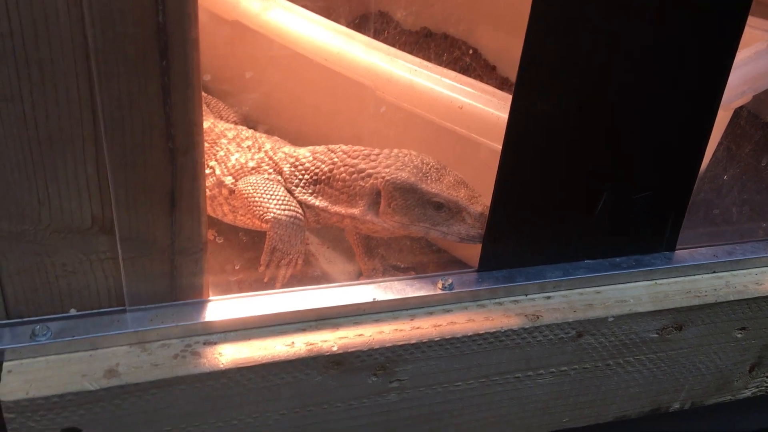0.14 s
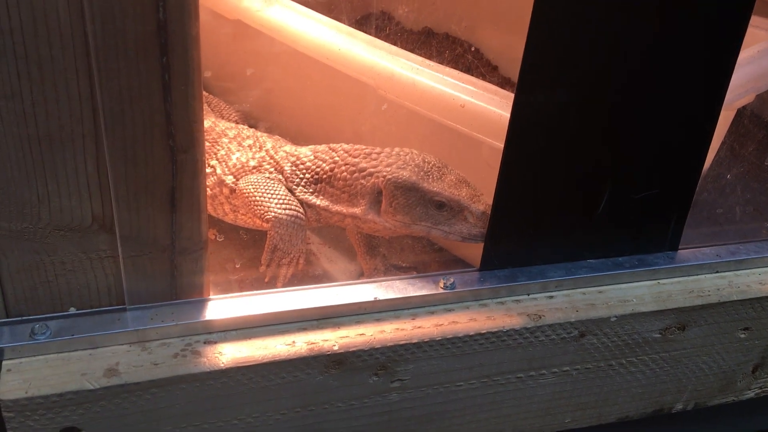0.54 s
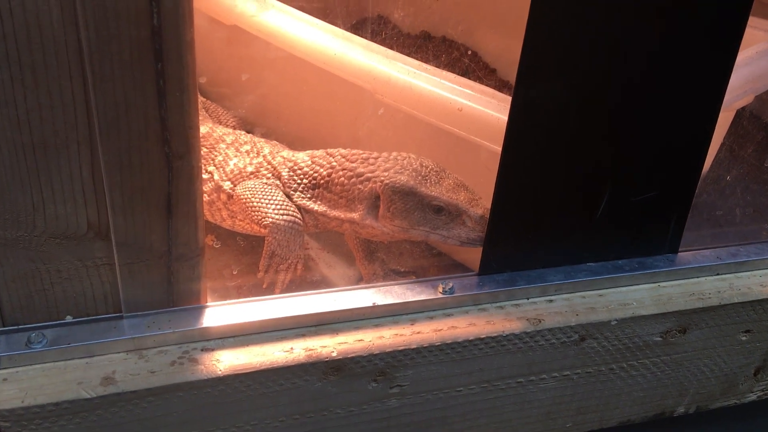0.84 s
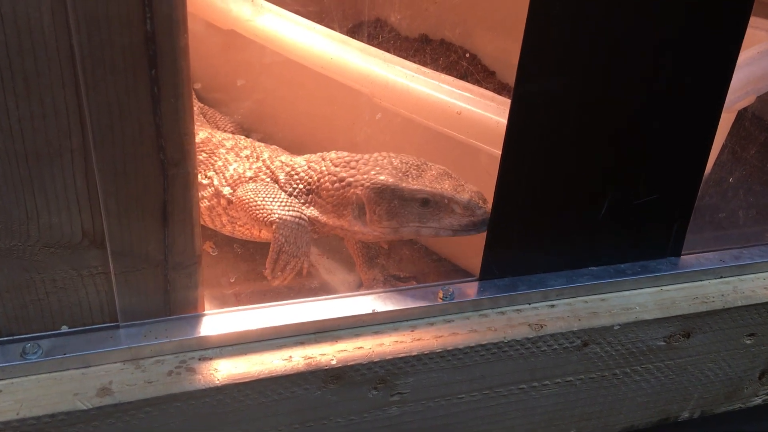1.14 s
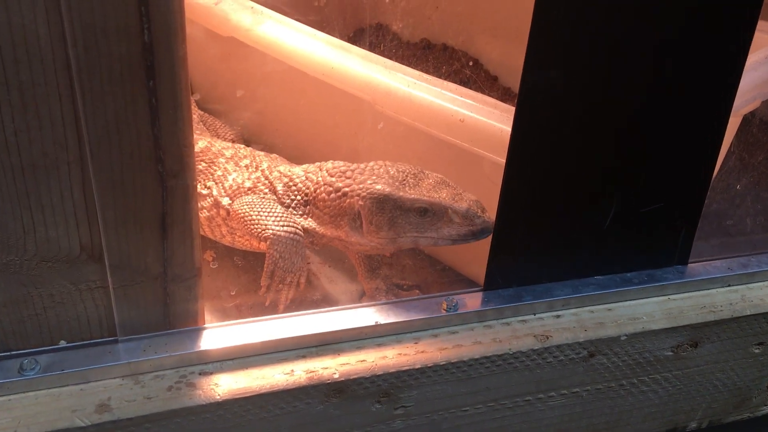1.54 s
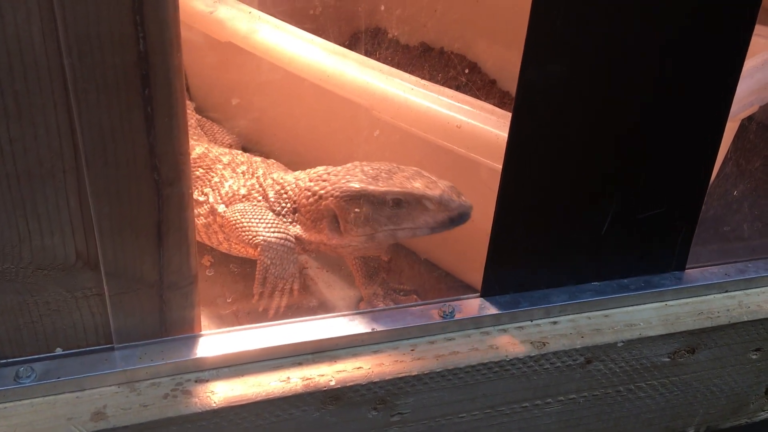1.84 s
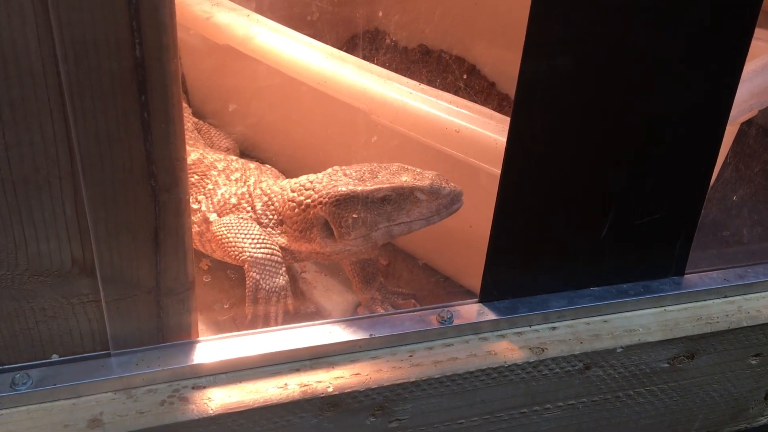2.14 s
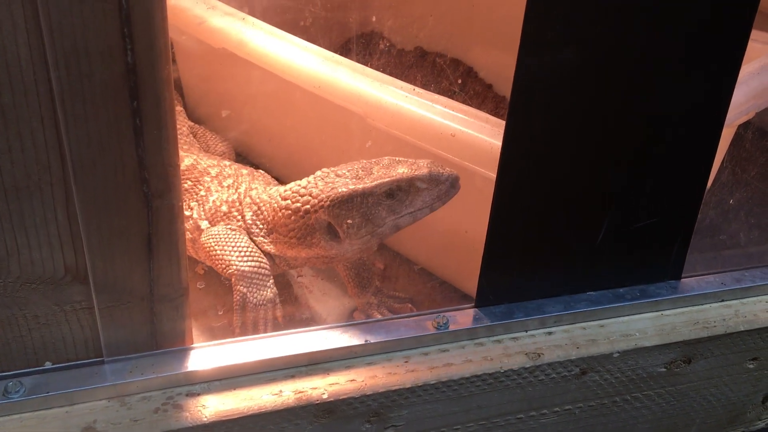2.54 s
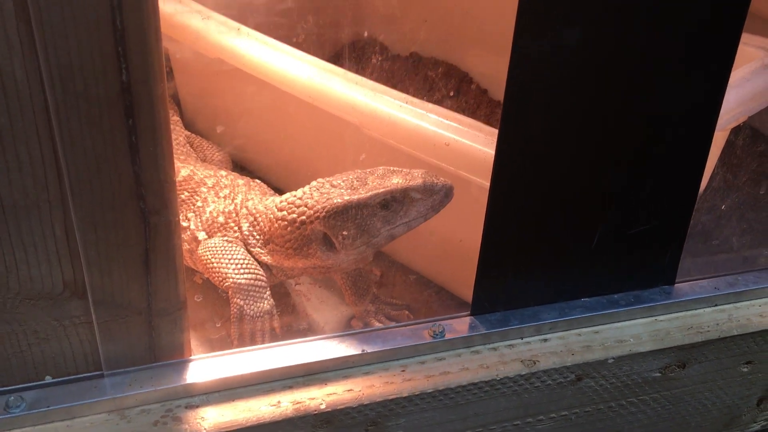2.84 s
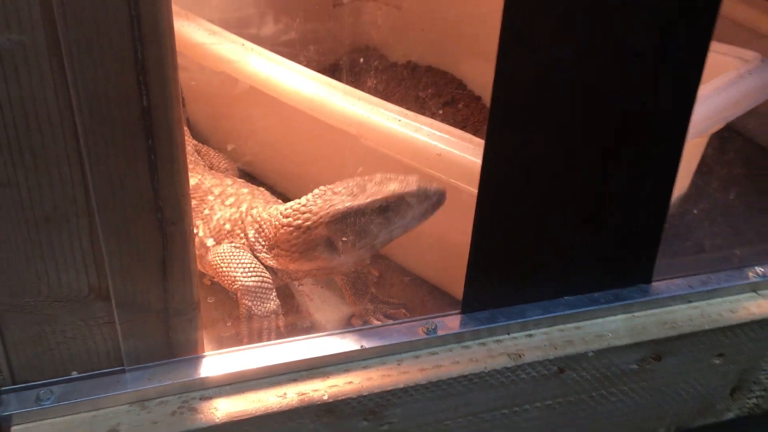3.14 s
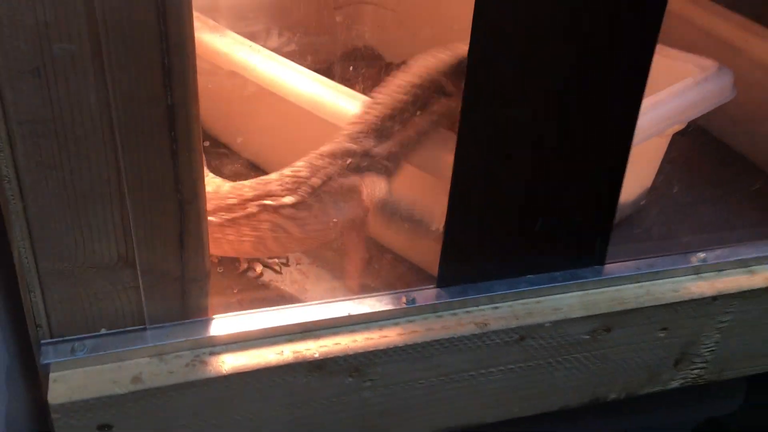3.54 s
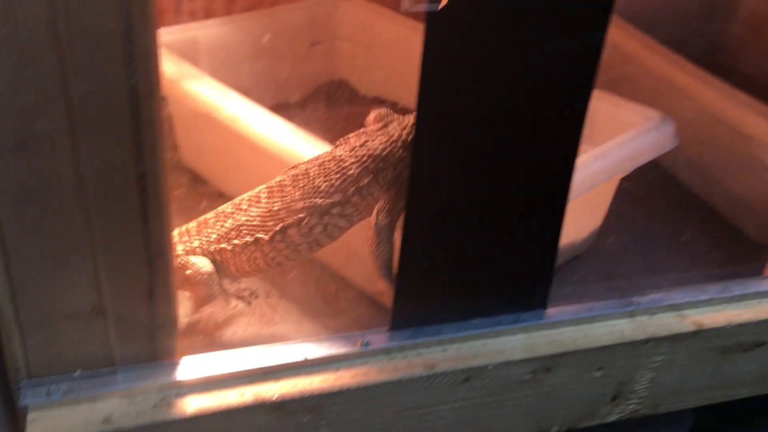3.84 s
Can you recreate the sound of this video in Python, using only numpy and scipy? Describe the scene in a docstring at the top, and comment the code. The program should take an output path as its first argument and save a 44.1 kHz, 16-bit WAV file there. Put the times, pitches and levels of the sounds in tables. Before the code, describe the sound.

A large lizard hisses in a wood and glass enclosure: faint puffs, one soft swelling hiss cut short, a pause, then a long grainy rasp, scales scraping a plastic tub and loud closing knocks; close microphone, quiet room.

```python
"""A quiet room with mains hum and a faint whine opens the scene; a foot scuffs and a frame is tapped.
In its wood and glass enclosure a monitor lizard then gives a few puffs and one soft swelling hiss.
It shifts its feet and moves off with a long hissing rasp, scales scraping over a plastic tub's rim.
Breath is filtered grainy noise, friction is clumped random slips, and knocks are decaying modes.
Claw ticks are short noise bursts; panes and enclosure add reflections."""
import sys
import numpy as np
from scipy import signal
from scipy.fft import rfft, irfft
from scipy.io import wavfile

SR = 44100
rng = np.random.default_rng(int(sys.argv[2]) if len(sys.argv) > 2 else 0)


def waveform_to_disk(signal):
    """Save audio, clipped to [-1, 1], as 16-bit WAV at the path in sys.argv[1]."""
    frames = np.transpose(np.atleast_2d(signal))
    scaled = np.clip(frames, -1, 1) * 32767
    samples = np.round(scaled).astype(np.int16)
    wavfile.write(sys.argv[1], SR, samples)


N = 176400
TIME = np.arange(N) / SR

# Room floor: colour (frequency [Hz], level per Hz [dB])
FLOOR_COLOUR = [(25, -38), (45, 2), (140, -5), (280, -14.5), (400, -12), (520, -21), (900, -18.5),
                (1200, -25.5), (2000, -27.5), (2300, -33.5), (4400, -33), (4950, -40), (5500, -27),
                (6500, -28.5), (7600, -38.5), (15800, -46)]
FLOOR_DB = -59.5
# Mains hum and whine: steady tones (frequency [Hz], rms level [dB])
HUM_TONES = [(59.2, -62.5), (118.4, -65), (177.6, -68.5), (236.9, -70), (1534, -76), (1949, -81.5)]

# Foot scuffs (time [s], length [s], gain [dB], tilt [dB per octave])
SCUFFS = [(0.015, 0.11, -64, 1.5), (2.1155, 0.027, -50.5, -0.5), (2.203, 0.048, -44.5, -1.5),
          (2.224, 0.081, -49, -4.5), (3.624, 0.036, -44, 7), (3.835, 0.045, -41, -1),
          (3.923, 0.015, -44.5, 6)]
# Scuff colour (frequency [Hz], level per Hz [dB])
SCUFF_COLOUR = [(150, 2.5), (350, -3), (600, 2), (1400, 1), (2400, -0.5), (4000, -8), (7000, -13.5),
                (15800, -25.5)]

# Light taps on the wooden frame (time [s], gain [dB])
TAPS = [(.0295, -51), (.04, -49)]
# Modes of the wooden frame (frequency [Hz], level [dB], decay by 60 dB [s])
FRAME_MODES = [(596, 5, 0.033), (1350, 3.5, 0.013), (2210, -11, 0.061), (3140, -10, 0.087),
               (3760, -6.5, 0.039)]
# Thuds and knocks of the body against the tub (time [s], gain [dB], contact [s])
KNOCKS = [(1.6, -59, 0.00045), (2.127, -34.5, 0.0031), (2.206, -26, 0.018), (3.9074, -15, 0.00011),
          (3.922, -10, 0.013), (3.9564, -28, 0.000092), (3.964, -20, 0.016)]
# Modes of the tub (frequency [Hz], level [dB], decay by 60 dB [s])
TUB_MODES = [(86, -19.5, 0.19), (165, -18.5, 0.19), (294, -14.5, 0.086), (491, -2.5, 0.043),
             (626, 8.5, 0.017), (980, 9.5, 0.01), (1490, -0.5, 0.018), (4340, -22, 0.013)]
RISE_CYCLES = 1.2  # each mode builds up over this many cycles, so the bass is last to fill out
# Bending wave in the tub's thin wall: treble arrives first, so the pitch falls
BEND_START_HZ, BEND_FALL_S = 1058, 0.032  # the pitch is a quarter of its start after the fall time
BEND_DB, BEND_SWELL_S = -5, 0.012  # gain; time of the loudest point

# Short puffs of air (time [s], length before the fade [s], level [dB])
PUFFS = [(0.323, .02, -74), (0.431, 0.076, -70.5), (0.568, 0.038, -71.5)]
# Puff colour (frequency [Hz], level per Hz [dB])
PUFF_COLOUR = [(1200, -10), (3200, 3), (9000, -21)]
# Soft hiss: swells, is pushed near the end and is cut off
HISS_START_S, HISS_PUSH_S, HISS_END_S = 0.65, 0.93, 1.0
HISS_ATTACK_S, HISS_RELEASE_S = 0.09, 0.014
HISS_END_DB, HISS_SWELL_DB_PER_S, HISS_PUSH_DB = -62, 38, 4  # the push adds to the end level
# Hiss colour (frequency [Hz], level per Hz [dB])
HISS_COLOUR = [(500, -7), (2100, 2), (3000, 1.5), (6000, -2), (7600, -3.5), (9200, -4), (15800, -15)]
# Hiss resonances (frequency [Hz], width [Hz], gain [dB])
HISS_PEAKS = [(2560, 85, 3.9), (4230, 91, 5.3), (5580, 150, 1)]

# Claw and grit ticks (time [s], gain [dB], tilt [dB per octave])
TICKS = [(0.347, -62, -2), (1.23, -56, 3), (3.6062, -26, -9), (3.609, -32.5, 12), (3.6385, -29.5, 5),
         (3.853, -33, -7), (3.9066, -30.5, -6), (3.9315, -34, -3)]
# Tick colour (frequency [Hz], level per Hz [dB])
TICK_COLOUR = [(300, -34), (1500, -3), (3500, -1), (7000, -2.5), (15800, -24)]
TICK_DECAY_S = 0.0016

# Weight shifting on the floor (time [s], level [dB])
WEIGHT_LEVEL = [(2.1, -61.5), (2.135, -49.5), (2.22, -49), (2.42, -57.5), (2.7, -65), (2.8, -44),
                (2.92, -62.5), (3.25, -45.5), (3.45, -48.5), (4.0, -50)]
# Weight colour (frequency [Hz], level per Hz [dB])
WEIGHT_COLOUR = [(30, -22), (65, 9), (130, -2), (220, -4), (400, -0.5), (1500, -35)]
# Scales sweeping over grit (time [s], level [dB])
SWEEP_LEVEL = [(2.165, -74), (2.18, -54), (2.225, -53), (2.29, -60.5), (2.34, -52.5), (2.5, -51.5),
               (2.62, -47), (2.85, -48.5), (2.885, -45), (3.17, -46.5), (3.26, -53.5), (3.37, -57),
               (3.46, -51), (3.63, -45), (3.89, -49), (3.99, -62)]
# Sweep colour (frequency [Hz], level per Hz [dB])
SWEEP_COLOUR = [(2000, 7.5), (3600, 9), (4800, 2), (6200, 7), (7800, -1.5), (9000, 3.5), (9950, 0.5),
                (10250, -4), (15800, -7)]

# Pushes of the long rasp (time [s], length before the fade [s], level [dB])
RASP_PUSHES = [(2.276, 0.18, -55), (2.46, 0.076, -48.5), (2.529, 0.11, -42), (2.669, .34, -39.5),
               (2.738, 0.045, -36), (3.068, 0.14, -38)]
RASP_ATTACK_S, RASP_RELEASE_S = 0.035, 0.049
# Rasp colour (frequency [Hz], level per Hz [dB])
RASP_COLOUR = [(120, -18), (220, -1), (480, -1.5), (1500, -2.5), (2600, -6), (3100, -20.5), (6000, -18.5),
               (9000, -51)]
# Enclosure resonances in the rasp (frequency [Hz], width [Hz], gain [dB])
RASP_PEAKS = [(726, 25, 3.4), (1006, 87, 3.7), (1510, 73, 9.4), (1810, 71, 6.4), (2144, 12, 3.2),
              (2550, 38, 7.6)]

# Scrape on the tub (time [s], level [dB])
SCRAPE_LEVEL = [(3.27, -44), (3.38, -53), (3.45, -46.5), (3.52, -42.5), (3.58, -39.5), (3.64, -37.5),
                (3.7, -39), (3.76, -44.5), (3.83, -41), (3.895, -44.5)]
# Scrape colour (frequency [Hz], level per Hz [dB])
SCRAPE_COLOUR = [(110, -30), (200, -2.5), (310, -17.5), (450, -1), (1300, -1), (3000, -15.5), (7000, -38),
                 (10000, -45)]
# Tub resonances in the scrape (frequency [Hz], width [Hz], gain [dB])
TUB_PEAKS = [(238, 25.5, 9.5), (432, 28, 5.5), (1286, 87, -4), (2870, 160, -1)]

# Resonances shift in pitch (share, rms) and strength (rms) as the animal moves
SHIFT_SHARE, SHIFT_DB, SHIFT_HZ = 0.01, 2, 9
# Nearby panes and walls (echo delay [s], gain [linear])
PANES = [(.0037, 0.18), (.0075, 0.29), (0.0136, .32), (.027, 0.26)]
PATH_WANDER_S = 0.000242  # rms change of each echo delay as the lizard moves
# Enclosure decay (frequency [Hz], decay by 60 dB [s])
BOX_DECAY = [(100, 0.11), (1000, 0.33), (15000, 0.027)]
EDGE_HZ = 15850  # top of the recorder's band


def amp(db):
    """Decibels to gain."""
    return 10 ** (np.asarray(db) / 20)


def unit(x):
    """Scales to rms 1."""
    return x / np.sqrt(np.mean(x ** 2) + 1e-20)


def read(points, hz):
    """Reads a table on a log-frequency axis."""
    f, value = np.transpose(points)
    return np.interp(np.log(hz + 1), np.log(f + 1), value)


def level(points, fade_db_per_s=400):
    """Gain from a level curve that fades outside its ends."""
    s, db = np.transpose(points)
    outside_s = abs(TIME - np.clip(TIME, s[0], s[-1]))
    return amp(np.interp(TIME, s, db) - fade_db_per_s * outside_s)


def add(mix, s, sound):
    """Mixes a sound in at a time."""
    part = mix[round(s * SR):][:len(sound)]
    part += sound[:len(part)]


def stroke(s, hold_s, attack_s, release_s, t=TIME):
    """Straight rise, then an exponential release once the hold, counted from the start, is over."""
    rise = np.clip((t - s) / attack_s, 0, 1)
    return rise * np.exp(-np.clip((t - s - hold_s) / release_s, 0, 20))


def colour(x, points, tilt_db=0):
    """Gives x a spectrum and a tilt per octave, at rms 1."""
    hz = np.fft.rfftfreq(len(x), 1 / SR)
    gain = amp(read(points, hz) + tilt_db * np.log2(hz / 1000 + 0.044))
    return unit(irfft(rfft(x) * gain, len(x)))


def drift(rate_hz, size=25):
    """Slow random motion, rms 1, drawn on every size-th sample."""
    coarse = TIME[::size]
    hz = np.fft.rfftfreq(len(coarse), size / SR)
    spectrum = rfft(rng.standard_normal(len(coarse))) / (1 + (hz / rate_hz) ** 4)
    return np.interp(TIME, coarse, unit(irfft(spectrum, len(coarse))))


def friction(per_s, spread_db, clump_db, clump_hz):
    """Tiny slips of uneven size that come in clumps."""
    size = amp(spread_db * np.minimum(rng.exponential(1, N), 4)) * rng.choice([-1, 1], N)
    slips = size * (rng.random(N) < per_s / SR)
    return unit(slips * amp(clump_db * drift(clump_hz)))


def resonate(x, peaks):
    """Adds resonances that each wander in pitch and strength."""
    out = x
    for hz, width, db in peaks:
        wandering_hz = hz * (1 + SHIFT_SHARE * drift(SHIFT_HZ))
        turn = np.exp(2j * np.pi * np.cumsum(wandering_hz) / SR)
        r = np.exp(-np.pi * width / SR)
        # Shift the resonance down to 0 Hz, smooth there, and shift back up
        ring = 2 * (turn * signal.lfilter([1 - r], [1, -r], x / turn)).real
        out = out + amp(db + SHIFT_DB * drift(SHIFT_HZ)) * ring
    return out


def panes(x):
    """Early reflections comb the sound; the pattern shifts slowly. Rms 1."""
    echoes = 0
    for s, gain in PANES:
        echoes = echoes + gain * np.interp(TIME - s - PATH_WANDER_S * drift(1), TIME, x)
    return unit(x + echoes)


def room():
    """Steady noise floor with mains hum and a thin, slightly wavering whine."""
    hum = np.zeros(N)
    for hz, db in HUM_TONES:
        waver = 0.082 * drift(9)  # phase, radians
        hum += amp(db) * np.sqrt(2) * np.sin(2 * np.pi * hz * TIME + waver)
    return hum + amp(FLOOR_DB) * colour(rng.standard_normal(N), FLOOR_COLOUR)


def scuffs(attack_share=0.064, release_share=0.25):
    """Short strokes of a foot, made of slips; longer ones swell and fade more slowly."""
    out, t = np.zeros(N), TIME[:SR // 4]
    slips = panes(friction(per_s=6000, spread_db=3, clump_db=1.5, clump_hz=147))
    for s, length, db, tilt_db in SCUFFS:
        grain = colour(np.roll(slips, -round(s * SR))[:len(t)], SCUFF_COLOUR, tilt_db)
        shape = stroke(0, length / 2, attack_share * length, release_share * length, t)
        add(out, s, amp(db) * shape * grain)
    return out


def struck(t, modes, contact_s):
    """Modes build up and decay; a longer contact gives a duller blow."""
    out = np.zeros(len(t))
    for hz, db, t60 in modes:
        envelope = np.minimum(t * hz / RISE_CYCLES, 1) * amp(db - 60 * t / t60)
        out += envelope * np.sin(2 * np.pi * hz * t) / np.hypot(1, hz * contact_s)
    return out


def bend(t, contact_s):
    """A bending wave that sinks from a clack to a low boom."""
    hz = BEND_START_HZ / (1 + t / BEND_FALL_S) ** 2
    age = t / BEND_SWELL_S
    wave = np.sin(2 * np.pi * np.cumsum(hz) / SR)
    return amp(BEND_DB) * age * np.exp(-age) * wave / np.hypot(1, hz * contact_s)


def knocks():
    """Light taps ring the frame's modes; the body's blows ring the tub's modes and bend its wall."""
    out, t = np.zeros(N), np.arange(SR // 3) / SR
    for s, db in TAPS:
        add(out, s, amp(db) * struck(t, FRAME_MODES, 0))
    for s, db, contact_s in KNOCKS:
        add(out, s, amp(db) * (struck(t, TUB_MODES, contact_s) + bend(t, contact_s)))
    return out


def soft_hiss():
    """Grainy air: a few puffs, then a stream that swells, resonates on the last push and stops short."""
    air = friction(per_s=4300, spread_db=1.5, clump_db=2.0, clump_hz=70)
    puffs = np.zeros(N)
    for s, length, puff_db in PUFFS:
        puffs += amp(puff_db) * stroke(s, length, HISS_RELEASE_S, HISS_RELEASE_S)
    push = np.clip((TIME - HISS_PUSH_S) / 0.045 + 0.5, 0, 1)
    swell_db = HISS_SWELL_DB_PER_S * np.minimum(TIME - HISS_END_S, 0)
    gain = amp(HISS_END_DB + swell_db + HISS_PUSH_DB * push)
    gate = stroke(HISS_START_S, HISS_END_S - HISS_START_S, HISS_ATTACK_S, HISS_RELEASE_S)
    plain = panes(colour(air, HISS_COLOUR))
    resonant = panes(colour(resonate(air, HISS_PEAKS), HISS_COLOUR))
    stream = gain * gate * ((1 - push) * plain + push * resonant)
    return stream + puffs * panes(colour(air, PUFF_COLOUR))


def ticks():
    """Claws and grains of grit snap against hard surfaces: fast-decaying bursts of noise."""
    out, t = np.zeros(N), np.arange(2048) / SR
    for s, db, tilt_db in TICKS:
        snap = colour(rng.standard_normal(len(t)), TICK_COLOUR, tilt_db)
        add(out, s, amp(db) * np.exp(-t / TICK_DECAY_S) * snap)
    return out


def crawl():
    """Fine grit slips under the scales, over the low rumble of shifting weight."""
    slips = friction(per_s=9000, spread_db=1.5, clump_db=1.33, clump_hz=59)
    grit = panes(colour(slips, SWEEP_COLOUR))
    weight = colour(rng.standard_normal(N), WEIGHT_COLOUR)
    return level(SWEEP_LEVEL) * grit + level(WEIGHT_LEVEL) * weight


def rasp():
    """A fluttering, grainy hiss that comes in pushes and rings the enclosure's resonances."""
    power = np.zeros(N)
    for s, length, db in RASP_PUSHES:
        power += (amp(db) * stroke(s, length, RASP_ATTACK_S, RASP_RELEASE_S)) ** 2
    flutter = friction(per_s=10000, spread_db=1.0, clump_db=0.5, clump_hz=71)
    return np.sqrt(power) * panes(colour(resonate(flutter, RASP_PEAKS), RASP_COLOUR))


def scrape():
    """Belly scales catch on the rim of the tub; their slips ring its resonances."""
    slips = friction(per_s=2800, spread_db=1.5, clump_db=1.5, clump_hz=61)
    return level(SCRAPE_LEVEL) * panes(colour(resonate(slips, TUB_PEAKS), SCRAPE_COLOUR))


def enclosure(x):
    """Dense short reflections between wood and glass, each band with its own decay."""
    count = SR // 3
    after_gap = np.arange(count) > 0.003 * SR
    taps = rng.standard_normal(count) * (rng.random(count) < 0.1) * after_gap
    hz, t, z = signal.stft(taps, SR, nperseg=256)
    decay = amp(-60 * t / read(BOX_DECAY, hz)[:, None])
    tail = signal.istft(z * decay, SR, nperseg=256)[1]
    return signal.fftconvolve(x, tail / np.linalg.norm(tail))[:N]


def scene():
    """Everything reaches one microphone, the same in both channels."""
    contacts, blows = scuffs() + ticks(), knocks()
    echoes = enclosure(amp(-8) * contacts + amp(-14.5) * blows)
    mono = room() + contacts + blows + soft_hiss() + crawl() + rasp() + scrape() + echoes
    return np.array([mono, mono])


def record(dry):
    """The microphone's bass cut and the recorder's band limit."""
    bass_cut = signal.butter(3, 36, "highpass", fs=SR, output="sos")
    cut = signal.sosfilt(bass_cut, dry)
    band_limit = signal.firwin(801, EDGE_HZ, window=("kaiser", 9), fs=SR)
    return signal.oaconvolve(cut, band_limit[None], "same")


dry = scene()
out = record(dry)
waveform_to_disk(out)
```